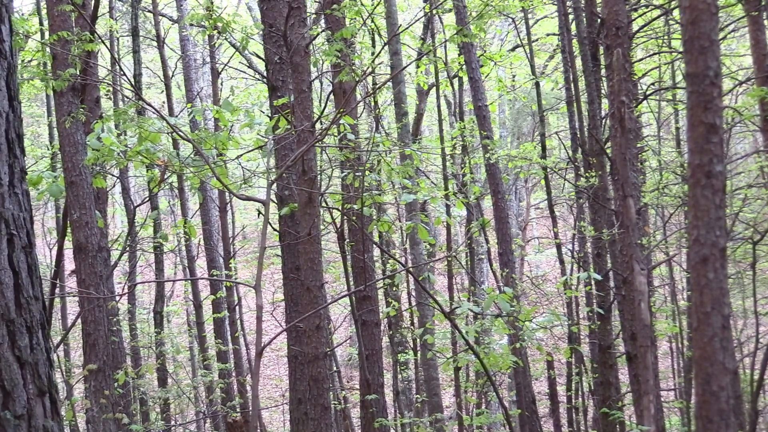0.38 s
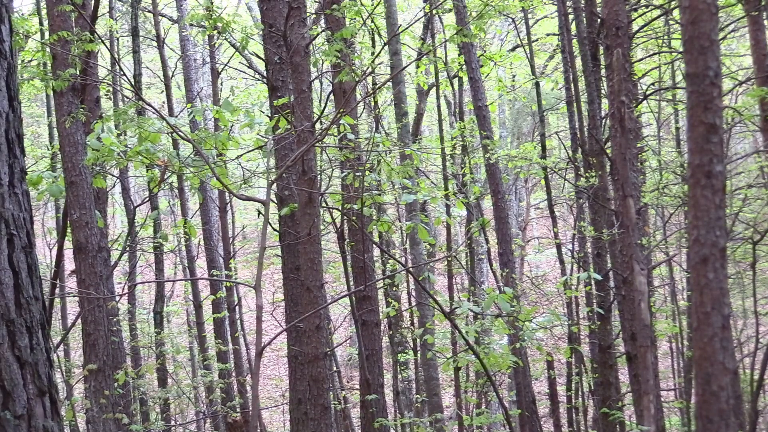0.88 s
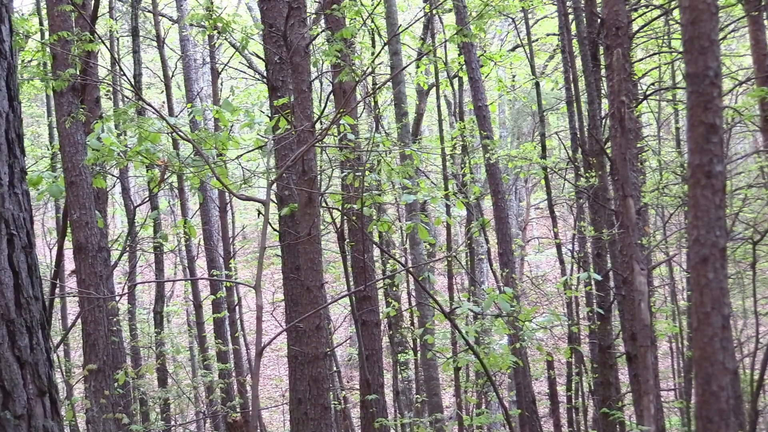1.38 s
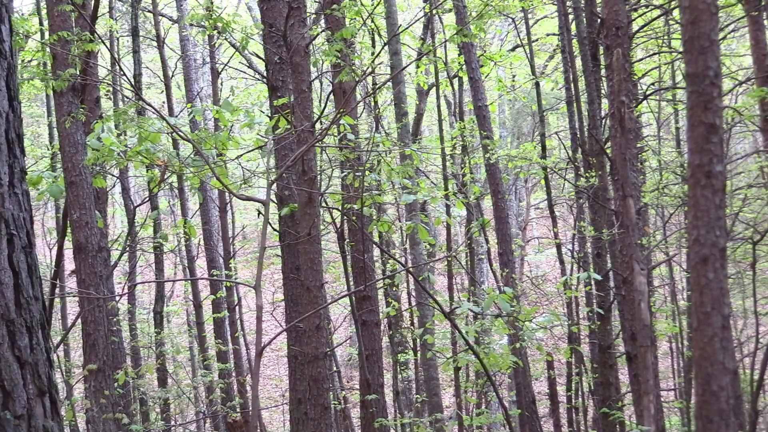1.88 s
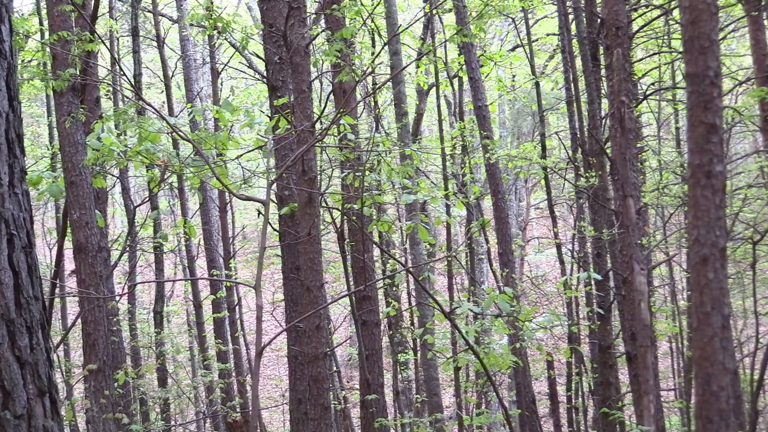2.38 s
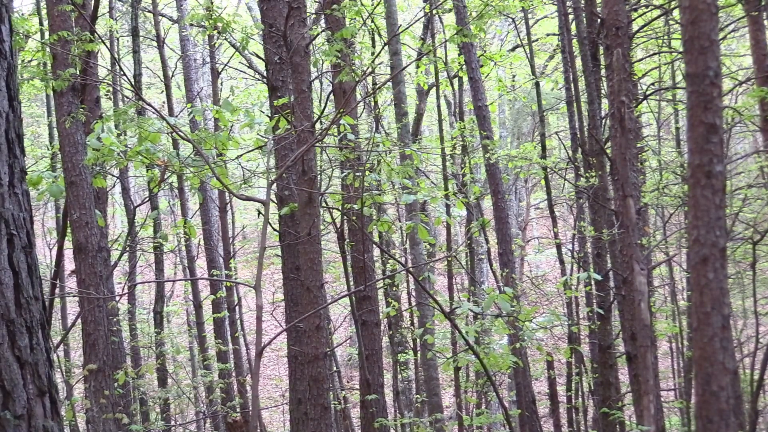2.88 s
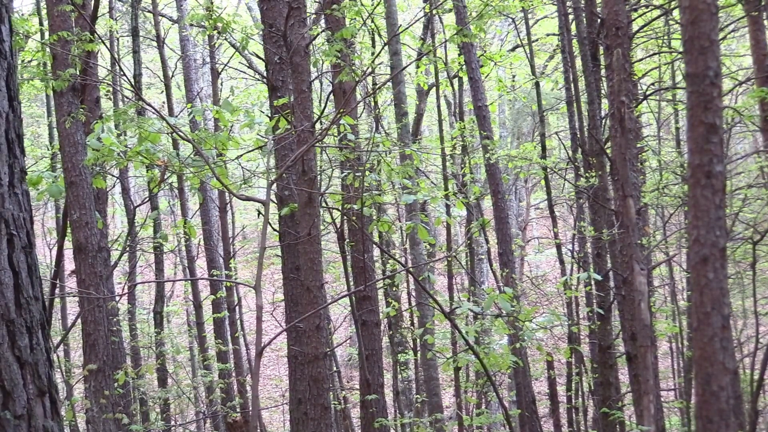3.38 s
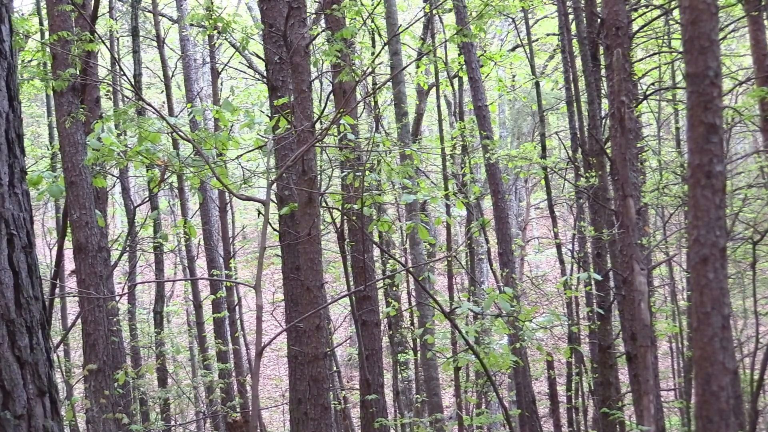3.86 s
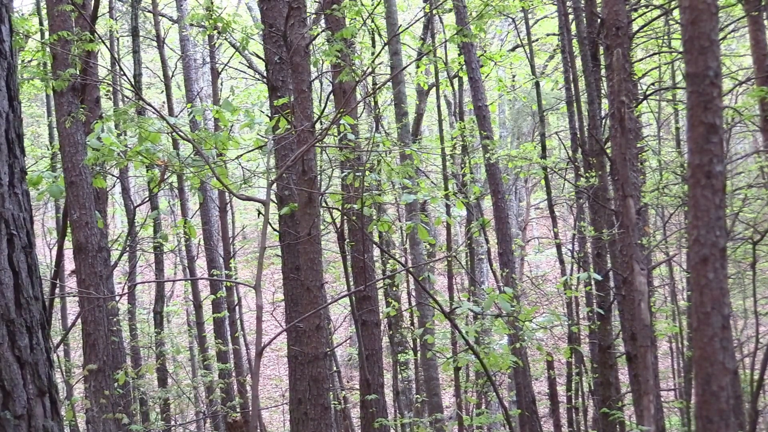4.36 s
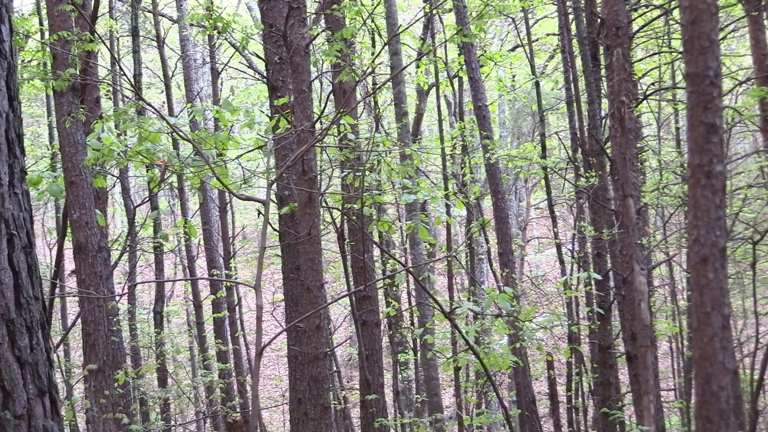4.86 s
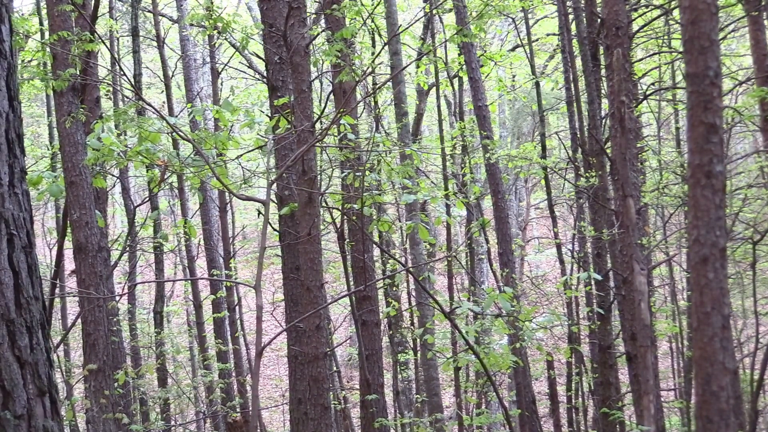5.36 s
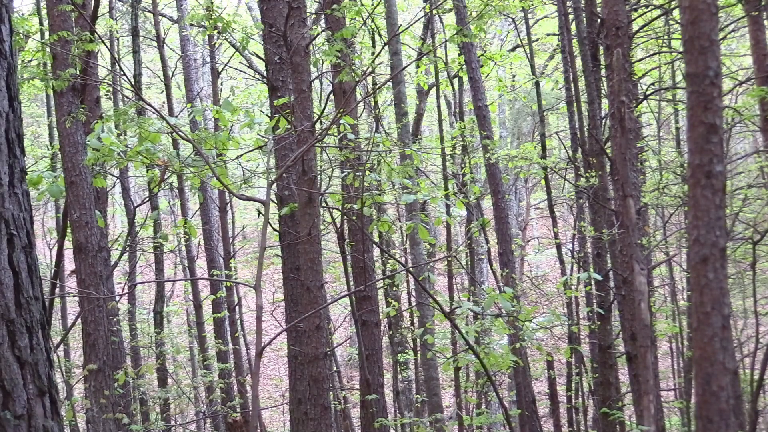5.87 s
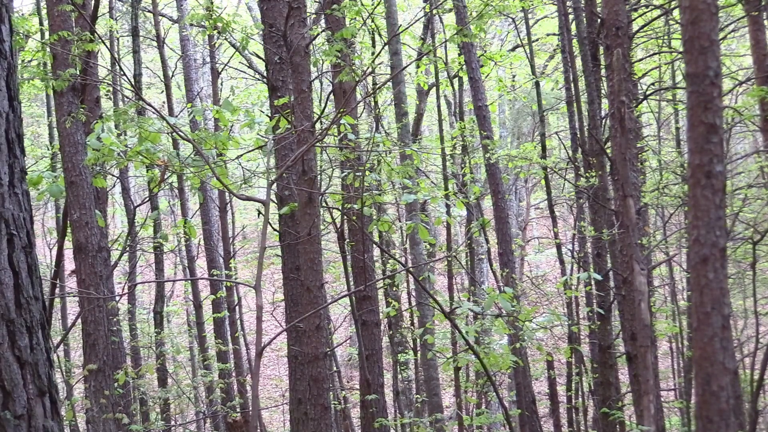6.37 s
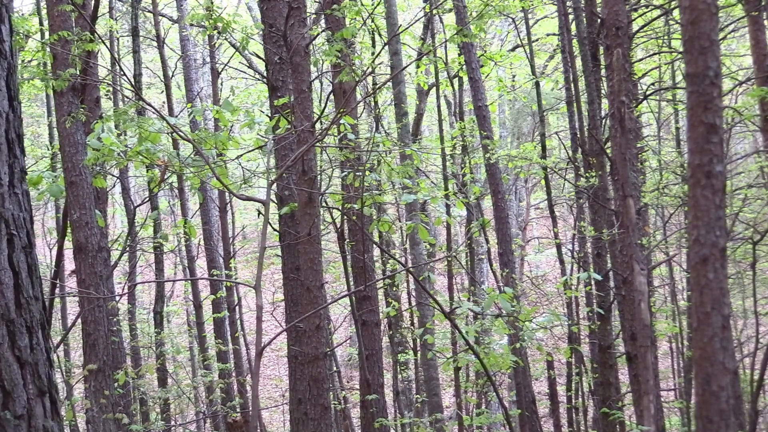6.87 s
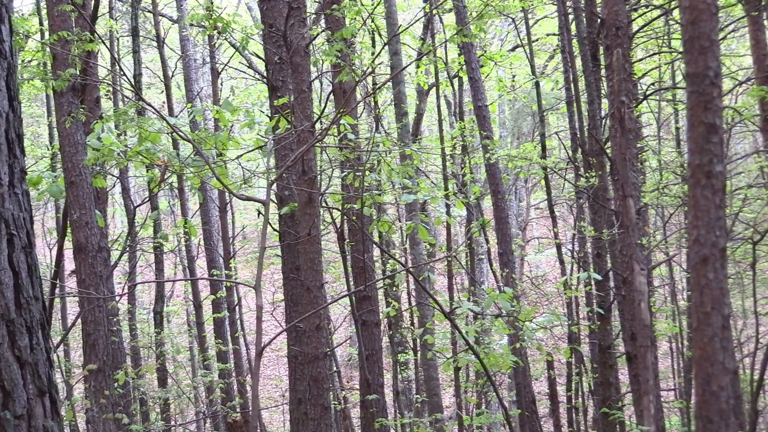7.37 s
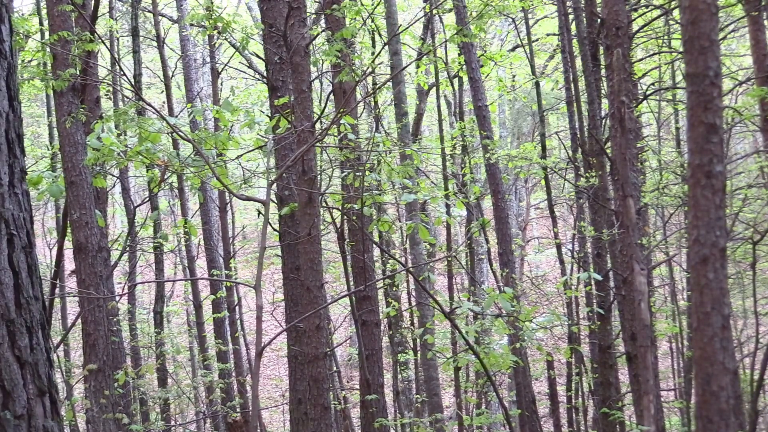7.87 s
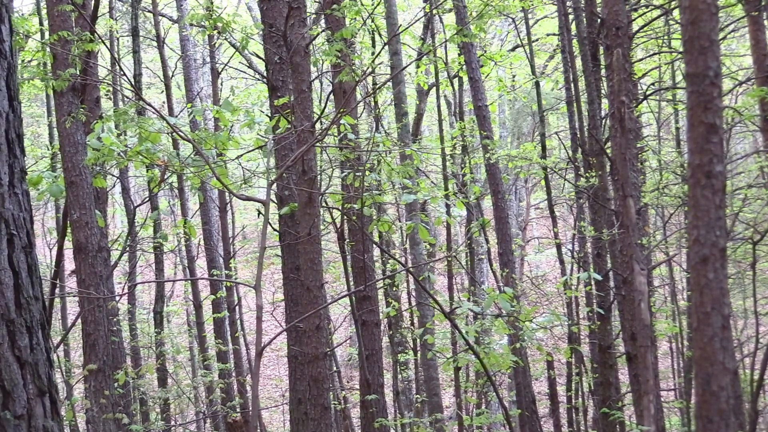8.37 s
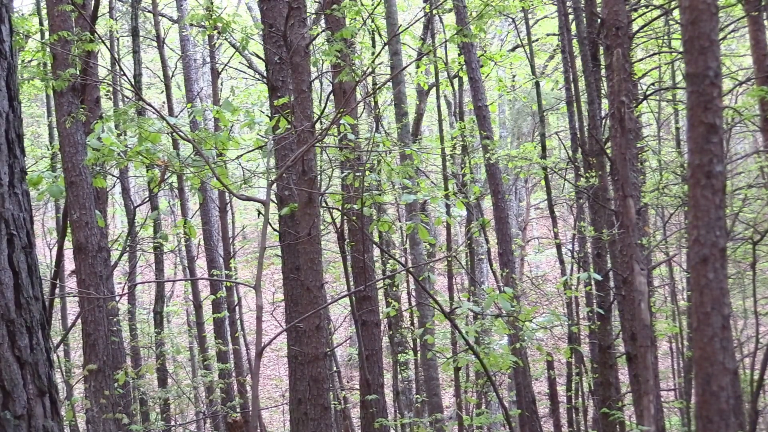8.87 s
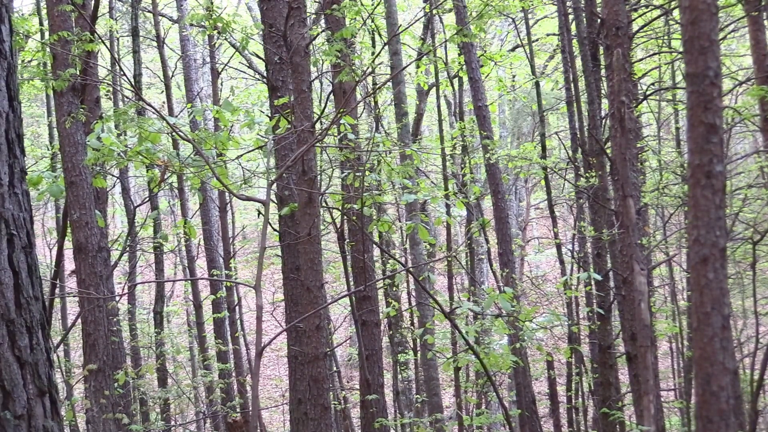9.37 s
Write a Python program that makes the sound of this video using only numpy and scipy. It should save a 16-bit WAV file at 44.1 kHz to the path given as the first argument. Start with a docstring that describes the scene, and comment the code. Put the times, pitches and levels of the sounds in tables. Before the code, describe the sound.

Wide stereo woodland ambience with low airy hiss and occasional twig ticks. Distant songbirds whistle first, echoing between trees. Near left, a turkey hen clucks abruptly, some clucks cracked or flicking upward. A more distant tom answers with a fast one-second rattling gobble. After a pause the hen yelps about three times a second, a brief bird whistle early in the run; the tom gobbles again before she stops.

```python
"""Spring wood, in order of time: far songbirds open with trilled whistles, tones of wavering frequency.
A near hen turkey on the left clucks: overtones of a gliding pitch, shaped by her mouth, smeared by roughness.
A tom further off gobbles: throat throbs and windpipe rattles over a chest drone. The hen's run of yelps on
bowl-shaped pitches begins, one more bird phrase sounds early in it, and later the tom gobbles again.
Throughout, noise bursts tick as twigs, shaped noise hums as air with a fuzzy low whistle; trunks scatter calls."""
import sys
import numpy as np
from scipy import signal
from scipy.fft import rfft, irfft
from scipy.io import wavfile
from scipy.ndimage import uniform_filter1d, minimum_filter1d

SR = 44100
rng = np.random.default_rng(int(sys.argv[2]) if len(sys.argv) > 2 else 0)


def nominal_scale(level):
    """Amplitude ratio for a level in decibels (scalar or array-like)."""
    x = np.asarray(level, float) / 20
    return 10 ** x


def wav_record(signal):
    """Record a signal, one row per channel, as 16-bit PCM in the file named by sys.argv[1]."""
    frames = np.transpose(np.atleast_2d(signal))
    bounded = np.clip(frames, -1, 1)
    # unit amplitude maps onto the largest positive 16-bit level
    quanta = np.round(bounded * 32767).astype(np.int16)
    wavfile.write(sys.argv[1], SR, quanta)


N = 429534  # samples in the scene

# the hen's run of yelps: start_s, length_s, level_db (before attack and sag), lowest_pitch_hz,
# beak_db (on the overtones above the second, before the beak's opening and shutting)
YELP_RUN = [(5.64, 0.038, -19.5, 713, 1), (5.936, 0.039, -11, 685.3, -0.5), (6.219, 0.039, -9.5, 665, -.5),
            (6.5, 0.052, -11, 616, 4), (6.789, 0.05, -10, 612.4, 2), (7.08, 0.049, -10, 640, 3),
            (7.38, 0.04, -11.5, 639, -1), (7.686, 0.04, -9, 560, -1.5), (7.997, 0.038, -6.5, 590.5, -1),
            (8.306, 0.036, -7, 607, -9), (8.644, 0.027, -13, 625, -5.5)]
# every yelp has a quick attack and a slow sag; its pitch is a bowl, lowest at DIP_AT of the length
ATTACK_S, ATTACK_DB, SAG_DB, DIP_AT = 0.0077, -18, -3.5, 0.49
FALL_PER_S2, CLIMB_PER_S2 = 340, 139  # pitch shares per second squared, before and after the dip
CLEAR, CLEAR_DB, CRACK_PER_DB = .02, -10, .02  # roughness share of a full yelp; weaker ones crack more
# lone clucks that flick up or break: roughness (0-1, before the rough onset), beak_db (as above),
# rows of (time_s, level_db, pitch_hz); one of them is a second voice
CLUCK_CURVES = [ (.03, 1.5, [(.957, -33, 850), (.965, -28, 790), (.982, -29, 755), (.993, -29, 830),
                (.997, -20, 920), (1.004, -17, 1090)]), (.1, -4, [(1.249, -27, 740), (1.255, -7, 760),
                (1.268, -12, 800), (1.274, -14, 880), (1.284, -18, 1150)]), (.02, -15, [(2.496, -33, 970),
                (2.503, -22, 955), (2.513, -25, 930), (2.523, -29, 965)]), (.05, -1, [(2.726, -34, 1000),
                (2.73, -22, 960), (2.738, -23, 760), (2.75, -17, 715), (2.763, -18, 780),
                (2.773, -20, 1000)]), (.08, -3, [(3.021, -36, 980), (3.024, -18, 960), (3.031, -21, 720),
                (3.038, -13, 695), (3.049, -5, 765), (3.063, -7, 720), (3.072, -16, 730)]),
                (.3, 4, [(3.041, -14, 515), (3.045, -3, 520), (3.056, -5, 575), (3.072, -11, 570)]),
                (.2, -2, [(5.367, -40, 600), (5.373, -33, 570), (5.383, -37, 800), (5.392, -34, 830),
                (5.402, -40, 830)]), ]
# formants of the hen's mouth: frequency_hz, relative_db
MOUTH_FORMANTS = [(480, -37), (620, -7.5), (760, -16.5), (960, 4), (1400, 9.5), (1600, 1), (1900, -7),
                  (2600, -8.5), (3150, -20), (3600, -32.5), (4200, -40.5), (9000, -36.5), (11000, -49)]
# transfer from the left port to the right: frequency_hz, right_weaker_db, right_lag_rad
RIGHT_PORT_TRANSFER = [(300, 21, -3), (557, -2, -2), (696, -4.5, -2), (980, 10, -1.7), (1382, 17, 9), (1620, 10, 6),
                       (1720, 0.5, 4.5), (2070, 2, 7.5), (2450, 2, 6.5), (4000, 0.5, 8)]

# onsets of the two gobbles: start_s
GOBBLE_STARTS = [3.58, 7.83]
# round throat throbs: peak_s (after the gobble's start), length_s, first_gobble_db, second_gobble_db
THROAT_THROBS = [(0.022, 0.0164, -31, -28.5), (.048, .03, -26, -25), (0.079, 0.0304, -28, -26),
                 (.112, .016, -31, -30), (0.134, 0.0199, -26, -19), (0.19, 0.016, -26, -22),
                 (0.235, 0.0291, -21, -16), (0.261, 0.0121, -24, -17.5), (0.304, .014, -25, -29),
                 (.324, 0.018, -26.5, -22.5), (0.37, 0.028, -22, -19), (.387, .016, -25, -23),
                 (.403, .014, -21, -20.5), (.437, .016, -27, -27), (.459, 0.0095, -21, -24),
                 (.54, .028, -28, -27), (0.599, 0.0193, -21.5, -23), (0.671, 0.029, -29, -30.5),
                 (.728, 0.0195, -22.5, -27), (0.798, 0.0224, -32, -22.5), (0.85, 0.0226, -27.5, -33),
                 (0.922, 0.025, -28.5, -22)]
# hoarse windpipe rattles: peak_s (after the gobble's start), length_s, first_gobble_db, second_gobble_db
HOARSE_RATTLES = [(.008, 0.0088, -25.5, -26), (.024, 0.015, -24, -18), (0.052, 0.032, -16.5, -20.5),
                  (.08, 0.01, -20, -23), (0.136, 0.046, -29, -29.5), (0.181, 0.012, -17, -18.5),
                  (.222, 0.0094, -20, -18.5), (.255, 0.015, -19, -25.5), (0.314, 0.0193, -21, -22),
                  (0.356, 0.0085, -18, -22.5), (.385, 0.0327, -19.5, -22), (0.455, 0.0203, -20.5, -21.5),
                  (0.529, .022, -22, -22.5), (0.599, 0.013, -21.5, -23), (.655, .034, -26.5, -28.5),
                  (.724, .016, -21, -25), (0.796, 0.0358, -30, -31), (0.85, 0.011, -23, -24.5),
                  (.921, 0.016, -29, -36), (0.975, 0.0096, -28.5, -28), (1.023, 0.0272, -34, -41)]
# windpipe resonances above the first, at strain 1: frequency_hz, width_hz, level_db
PIPE_RESONANCES = [(1614, 123, -16), (2296, 150, -22), (2705, 140, -28.5), (3480, 98, -33),
                   (4030, 210, -38), (5170, 200, -37.5)]
# moments when the throat is slack and its pitch lowest: time_s (after the gobble's start)
SLACK_MOMENTS = [.008, .035, .082, .14, .18, .222, .267, .325, .357, .41, .46, .53, .602, .657, .73, .8,
                 .852, .935]
THROAT_HZ, HOLD_S, THROAT_SAG_HZ_PER_S = 565, 0.399, 35  # lowest throat pitch holds, then sags
CRY_HZ, CRY_S = 1370, 0.1627  # first windpipe resonance, and duration, of the opening cry
NECK_HZ, REST_HZ, RELAX_S = 1040.5, 860, 0.602  # then the neck relaxes from NECK_HZ toward REST_HZ
DRONE_DB, DRONE_RISE_DB, DRONE_S = -57, 3, 1.09  # chest drone under the gobble
BEND_S, THROB_BEND, RATTLE_BEND, CRY_BEND = .024, .2, .16, -.13  # pitch shares reached within BEND_S

# songbirds, one table a phrase: time_s, level_db, pitch_hz, trill_scale_hz
SONG_PHRASES = [
    [(.11, -49, 2960, 22), (.16, -44.5, 2858, 84), (.25, -46, 2620, 360), (.36, -50, 2836, 520),
     (.5, -82, 2810, 350)],
    [(.675, -51, 5400, 40), (.70, -45.5, 4080, 90), (.74, -44, 3197, 300), (.82, -55, 2790, 397),
     (.9, -63, 2890, 400)],
    [(5.72, -58, 4860, 22), (5.76, -72, 4000, 20), (5.83, -57, 3110, 25), (5.865, -54, 2450, 32),
     (5.905, -54, 3410, 28)],
]
# twigs and leaves: time_s, level_db (before a common lift)
TWIG_TICKS = [(1.1732, -43.5), (2.8064, -39.5), (4.9867, -42.5), (5.586, -46), (6.1154, -44.5),
              (6.773, -40.5), (7.265, -41), (9.0182, -45), (9.5923, -44), (9.641, -39.5)]
# spectrum of the air noise: frequency_hz, relative_db
AIR_SPECTRUM = [(18, -39), (30, -6), (182, -4.5), (219, -4.5), (411, -2.5), (548, -5), (641, -2),
                (1200, -9), (1560, -11.5), (2850, -14), (4220, -17.5), (15600, -27)]
AIR_DB = -45  # rms level of the air noise
# left-right correlation of the air noise: frequency_hz, likeness (share)
AIR_LIKENESS = [(60, 0.98), (180, 1), (550, 0.95), (1650, 0.49), (4970, 0.85), (15000, 0.95)]
# low whistle in the air: time_s, level_db (of the complex tone; its real part is 3 dB lower)
AIR_WHISTLE = [(0.0, -50.5), (8.63, -51), (9.74, -40)]
# decay of the scattered tail at depth 1: frequency_hz, t60_s
TRUNK_DECAY = [(400, 0.37), (1100, 0.92), (3000, 1), (8000, 0.082)]
REACH = 2600  # samples on each side of a syllable's peak


def hen():
    """Harmonic synthesis: overtones of one pitch pass the mouth's formants; a cracking voice smears them."""
    out = np.zeros(N)
    for crack, beak_db, rows in CLUCK_CURVES + [yelp(*row) for row in YELP_RUN]:
        lead = np.add(rows[0], [-.012, -17, 90])  # a faint hoarse scoop from above
        stop = np.add(rows[-1], [.008, -20, 30])  # the voice breaks off upward
        t, db, hz = played([lead, *rows, stop])
        hz = uniform_filter1d(hz, size=110)
        level = uniform_filter1d(nominal_scale(db), size=110)
        since_s = t - t[0]
        rough_onset = .5 * np.clip(1 - since_s / .022, 0, 1)
        crack = np.clip(crack + rough_onset, 0, 1)

        k = np.arange(1, 17)[:, None]  # overtone numbers
        # the beak opens and shuts over the syllable
        opening_db = beak_db - 5.6 * np.cos(np.pi * since_s / (t[-1] - t[0])) ** 2
        heights = nominal_scale(read(MOUTH_FORMANTS, k * hz) + opening_db * (k > 2))
        heights /= np.sqrt((heights ** 2).sum(0) / 2)
        crack = np.minimum(crack * k / 2, 1)  # high overtones smear more
        smear = np.array([np.sqrt(1 - share) + np.sqrt(share) * flutter(len(t), 295) for share in crack])
        overtones = heights * smear * tone(hz) ** k * np.exp(.6j * k)
        soft = signal.windows.tukey(len(t), .15)
        add(out, t[0], soft * level * overtones.real.sum(0))
    return out


def yelp(start, length_s, db, low_hz, beak_db):
    """Frequency glide: a parabolic pitch bowl under an attack and sag; gives roughness, beak and rows."""
    t = np.linspace(0, length_s, num=20)
    attack_db = ATTACK_DB * np.clip(1 - t / ATTACK_S, 0, 1) ** 2
    sag_db = SAG_DB * np.clip(t / length_s - DIP_AT, 0, 1) / (1 - DIP_AT)
    off_s = t - DIP_AT * length_s
    hz = low_hz * (1 + np.where(off_s < 0, FALL_PER_S2, CLIMB_PER_S2) * off_s ** 2)
    roughness = CLEAR + CRACK_PER_DB * max(CLEAR_DB - db, 0)
    return roughness, beak_db, np.transpose([start + t, db + attack_db + sag_db, hz])


def from_left(x):
    """Interference: the right port hears the near bird with frequency-dependent level and lag."""
    hz = np.fft.rfftfreq(N, 1 / SR)
    transfer = nominal_scale(-read(RIGHT_PORT_TRANSFER, hz)) * np.exp(-1j * read(RIGHT_PORT_TRANSFER, hz, axis=2))
    return np.array([x, irfft(rfft(x) * transfer, N)])


def tom():
    """Superposition: throbs and rattles ride on a chest drone while throat and neck relax."""
    out = np.zeros(N)
    for which, start in enumerate(GOBBLE_STARTS):
        for s, length_s, *db in THROAT_THROBS:
            add(out, start + s - REACH / SR, nominal_scale(db[which]) * throb(s, length_s))
        for s, length_s, *db in HOARSE_RATTLES:
            if s < CRY_S:
                hz, bend = CRY_HZ, CRY_BEND
            else:
                hz = REST_HZ + (NECK_HZ - REST_HZ) * np.exp((CRY_S - s) / RELAX_S)
                bend = RATTLE_BEND
            add(out, start + s - REACH / SR, nominal_scale(db[which]) * rattle(length_s, hz, bend))
        t = np.arange(0, DRONE_S, 1 / SR)
        drone = tone(np.full(len(t), 75)) * (0.83 + 0.91 * flutter(len(t), 19))
        level = np.sqrt(2) * nominal_scale(DRONE_DB + DRONE_RISE_DB * t / DRONE_S)
        add(out, start, level * drone.real * signal.windows.tukey(len(t), .2))
    return out


def throb(s, length_s):
    """Tension raises pitch: a round tone climbs with the time from the nearest slack moment."""
    u, shape = swell(length_s, 0.7)
    apart_s = abs(s + u * length_s - np.reshape(SLACK_MOMENTS, (-1, 1))).min(0)
    low_hz = THROAT_HZ - THROAT_SAG_HZ_PER_S * max(s - HOLD_S, 0)
    hz = uniform_filter1d(low_hz * (1 + THROB_BEND * np.minimum(apart_s / BEND_S, 1)), size=200)
    return np.sqrt(2) * shape * (tone(hz) * (1 + .3 * flutter(len(u), 110))).real


def rattle(length_s, hz, bend):
    """Pipe resonance: a breathy burst rings all windpipe modes, shifted and widened by strain."""
    u, shape = swell(length_s, .4)
    strain, even = hz / 960, np.ones(len(u))  # more strain: higher, wider, raspier
    first_hz = bent(hz, bend, length_s, u, -.003)
    first = tone(first_hz) * (.9 + .4 * flutter(len(u), 200 * strain ** 2))
    breath = swell(length_s + 0.024, 0.53)[1]  # breath outlasts the first ring
    ring = np.zeros(len(u), complex)
    for pipe_hz, width_hz, pipe_db in PIPE_RESONANCES:
        breathy = flutter(len(u), width_hz * strain ** 2)
        mode_hz = bent(pipe_hz * strain ** .6, bend / 3, length_s, u, 0)
        ring += nominal_scale(pipe_db - 10 * (strain - 1)) * tone(mode_hz) * breathy
    high_rasp = tone(3600 * even) * flutter(len(u), 1700)
    low_rasp = tone(1150 * even) * flutter(len(u), 760)
    ring += nominal_scale(-25.5 + 18 * (strain - 1)) * high_rasp + nominal_scale(-16) * low_rasp
    return np.sqrt(2) * (shape * first + breath * ring).real


def bent(hz, bend, length_s, u, turn_s):
    """Frequency glide: a pitch bowl or arch turning turn_s after the syllable's peak."""
    return hz * (1 + bend * np.minimum(abs(u * length_s - turn_s) / BEND_S, 1) ** 1.5)


def swell(length_s, rise):
    """Gaussian envelope: a syllable peaks mid-frame and rises faster than it falls; u is time in lengths."""
    u = np.arange(-REACH, REACH) / SR / length_s
    return u, np.exp(-2 * np.where(u < 0, u / rise, u) ** 2)


def songbirds():
    """Frequency modulation: a fast uneven trill wavers each whistle."""
    out = np.zeros(N)
    for rows in SONG_PHRASES:
        t, db, hz, scale_hz = played(rows)
        trill = 0.63 * np.sin(2 * np.pi * 45 * t) + .8 * flutter(len(t), 126).real
        whistle = tone(hz + scale_hz * trill).real
        add(out, t[0], np.sqrt(2) * nominal_scale(db) * whistle * signal.windows.tukey(len(t), .1))
    return out


def twigs():
    """Impulsive excitation: each tick is a wide band of noise decaying exponentially in a few ms."""
    out, t = np.zeros(N), np.arange(600) / SR
    for s, db in TWIG_TICKS:
        snap = (tone(np.full(len(t), 4500)) * flutter(len(t), 4000)).real
        add(out, s, nominal_scale(db + 5.5) * snap * np.exp(-t / 0.0037))
    return out


def air():
    """Partly correlated noise: a shaped hiss and hum with faint patches, and a narrow-band low whistle."""
    frames, hz = N // 256 + 5, np.fft.rfftfreq(1024, 1 / SR)
    a, b, c, d, patches = rng.standard_normal((frames, 513, 5)).T
    patches = uniform_filter1d(patches, size=14, axis=0)  # across frequency
    patches = evened(uniform_filter1d(patches, size=10, axis=1))  # across time
    same = np.clip(read(AIR_LIKENESS, hz), -1, 1)[:, None]
    left, other = a + 1j * b, c + 1j * d
    z = np.array([left, same * left + np.sqrt(1 - same ** 2) * other])
    z *= nominal_scale(read(AIR_SPECTRUM, hz)[:, None] + 0.87 * patches)
    z *= (hz < 15800)[:, None]  # upper band edge
    hiss = nominal_scale(AIR_DB) * evened(signal.istft(z, nperseg=1024, noverlap=768)[1][:, :N])
    whistle_db = np.interp(np.arange(N) / SR, *np.transpose(AIR_WHISTLE))
    whistle = (tone(np.full(N, 690)) * flutter(N, 76)).real
    return hiss + nominal_scale(whistle_db) * whistle


def trunks(x, start_s, shared, depth):
    """Multiple scattering: sparse random-sign echoes, partly alike in both ports; depth scales band t60s."""
    taps = np.zeros((2, SR))
    at = np.arange(0, SR - 20, 20) + rng.integers(0, 20, (2, SR // 20 - 1))
    np.put_along_axis(taps, at, rng.choice([-1., 1.], at.shape), 1)
    taps[1] = shared * taps[0] + np.sqrt(1 - min(shared, 1) ** 2) * taps[1]
    hz, t, z = signal.stft(taps, SR, nperseg=256)
    decay = nominal_scale(-60 * t / depth / read(TRUNK_DECAY, hz)[:, None])
    tail = signal.istft(z * decay, SR, nperseg=256)[1]
    tail = np.pad(tail / np.linalg.norm(tail[0]), ((0, 0), (round(start_s * SR), 0)))
    return signal.fftconvolve(x[None], tail, axes=1)[:, :N]


def flutter(length, width_hz):
    """Narrow-band noise: complex, rms 1, from two equal poles; times a tone it is noise in a resonance."""
    r = np.exp(-np.pi * width_hz / SR)
    z = rng.standard_normal((length + 800, 2)) @ [1, 1j]
    return evened(signal.lfilter([1], np.convolve([1, -r], [1, -r]), z)[800:])  # skips the build-up


def tone(hz):
    """Phase is the integral of frequency: a complex tone follows a pitch curve."""
    return np.exp(2j * np.pi * np.cumsum(hz) / SR)


def evened(x):
    """Power normalisation: scales to rms 1."""
    return x / np.sqrt(np.mean(abs(x) ** 2) + 1e-20)


def read(points, hz, axis=1):
    """Logarithmic frequency scale: interpolates a spectrum column along it."""
    table = np.transpose(points)
    return np.interp(np.log(hz + 1), np.log(table[0] + 1), table[axis])


def played(rows):
    """Linear interpolation: gives the time axis and the joined columns of a curve."""
    s, *columns = np.transpose(rows)
    t = np.arange(s[0], s[-1], 1 / SR)
    return [t] + [np.interp(t, s, c) for c in columns]


def add(mix, s, sound):
    """Superposition: adds a sound into the mix at s seconds."""
    part = mix[round(s * SR):][:len(sound)]
    part += sound[:len(part)]


def scene():
    """Direct-to-scattered ratio sets distance: near hen almost dry, tom partly wet, songbirds about half echo."""
    near, middle, far = hen(), tom(), songbirds()
    ground = nominal_scale(-17) * trunks(near, 0.003988, .7, 0.097)[0]  # close ground echoes
    out = from_left(near + ground) + nominal_scale(-28) * trunks(near, 0.02, 0.61, 0.6)
    out += middle + nominal_scale(-12.5) * trunks(middle, .015, 0.84, 2.1)
    out += far + trunks(far, .004, 0.8, 1.2)
    return out + twigs() + air()


def low_pass(x):
    """Removes everything above the highest recorded frequency."""
    return signal.sosfilt(signal.butter(12, 16450, fs=SR, output="sos"), x)


def record(dry):
    """Peak limiting: a smoothed gain holds the loudest sounds under full scale."""
    ceiling = .93
    room = minimum_filter1d(ceiling / np.maximum(abs(dry).max(0), ceiling), size=301)
    limited = dry * uniform_filter1d(room, size=151)
    return low_pass(limited)


dry = scene()
out = record(dry)
wav_record(out)
```